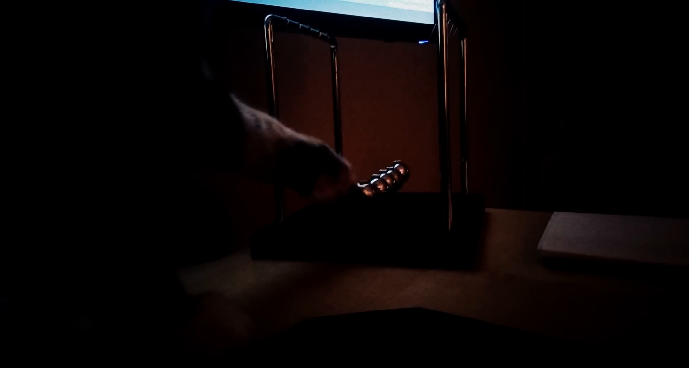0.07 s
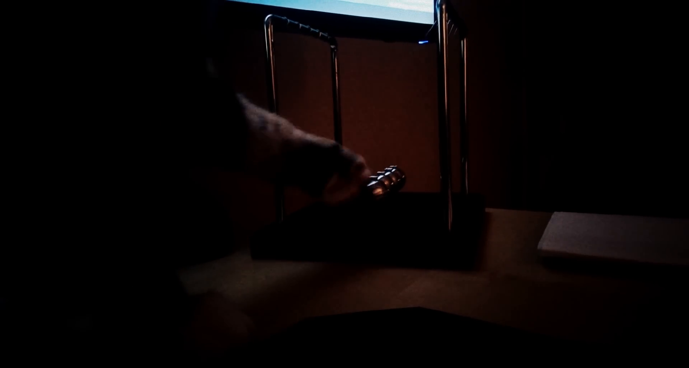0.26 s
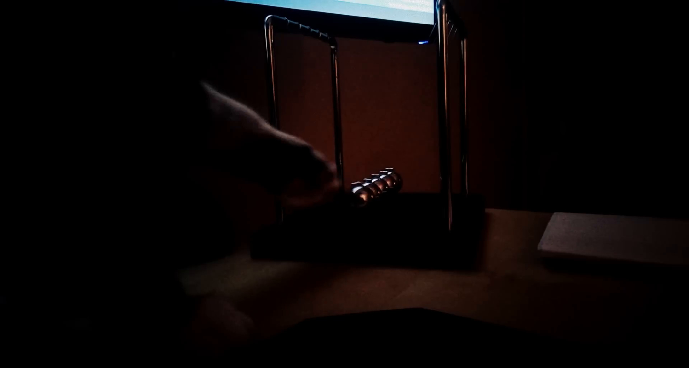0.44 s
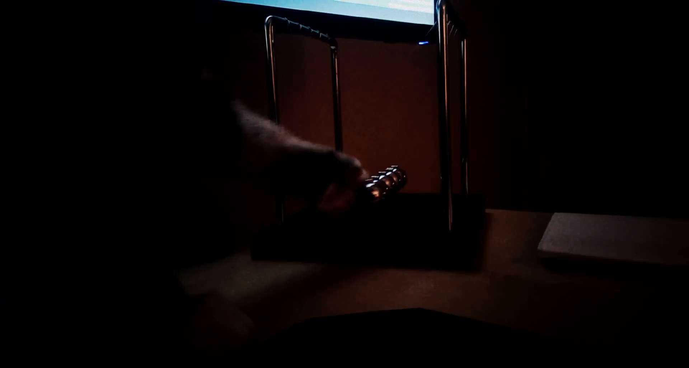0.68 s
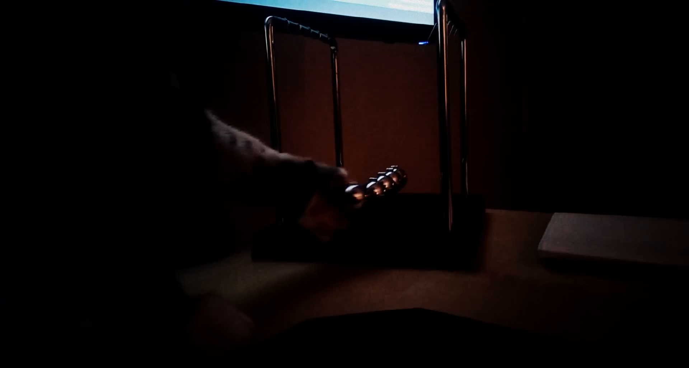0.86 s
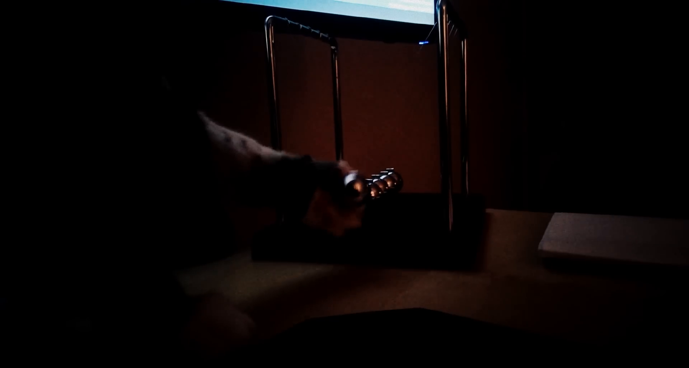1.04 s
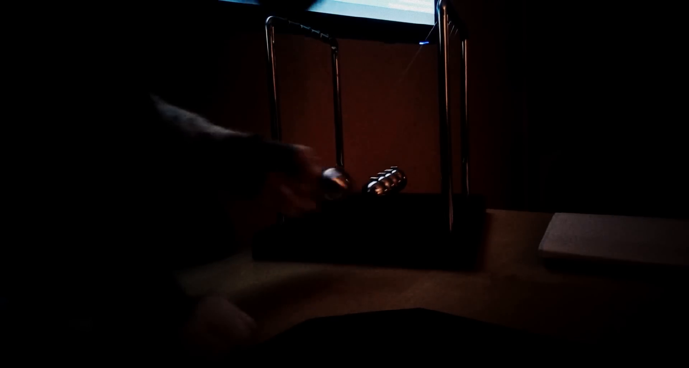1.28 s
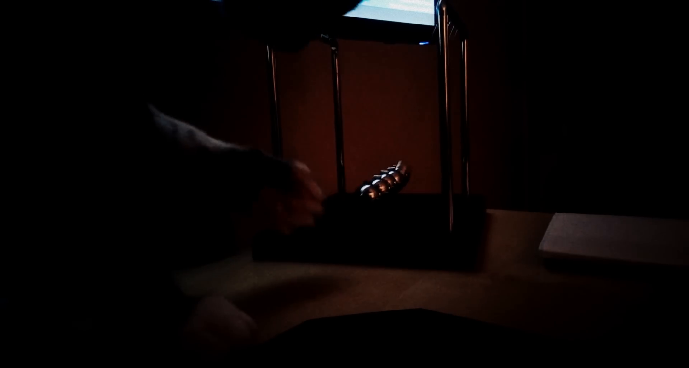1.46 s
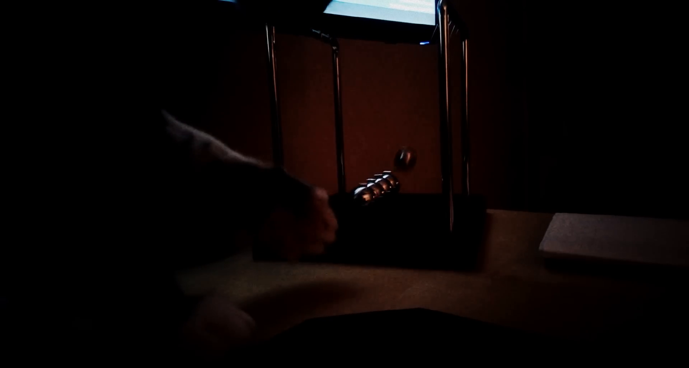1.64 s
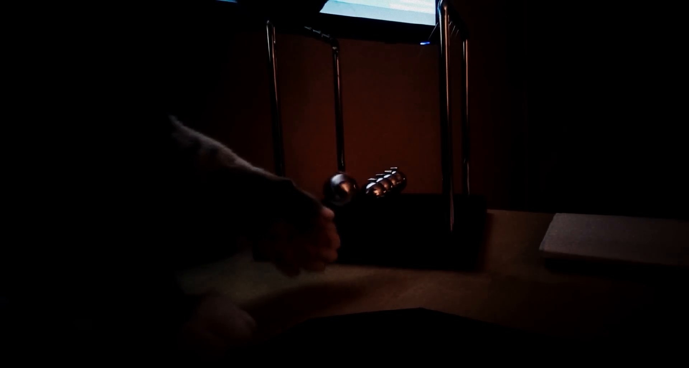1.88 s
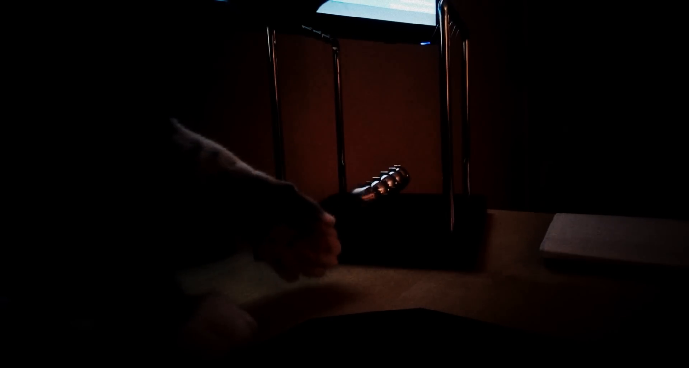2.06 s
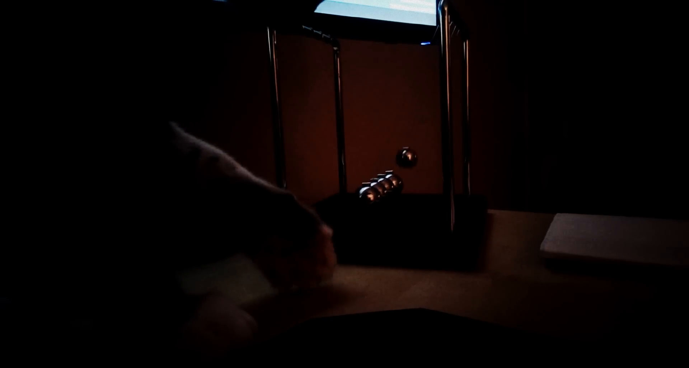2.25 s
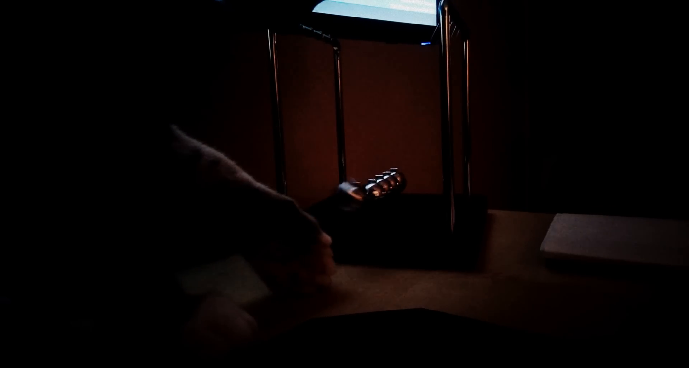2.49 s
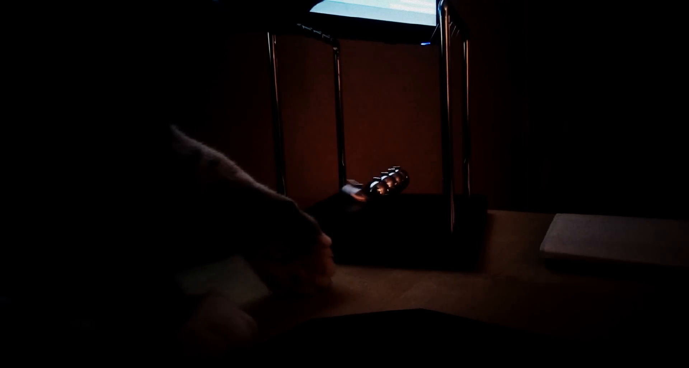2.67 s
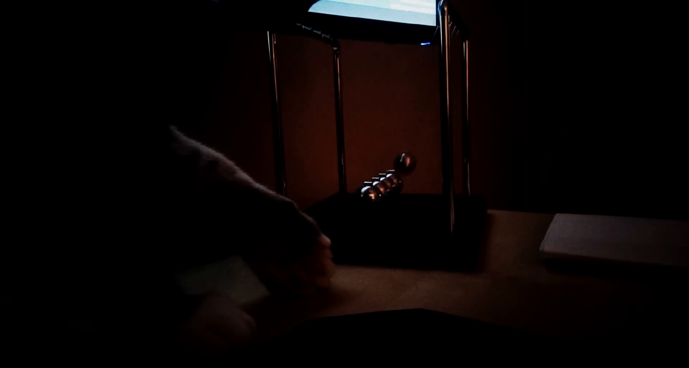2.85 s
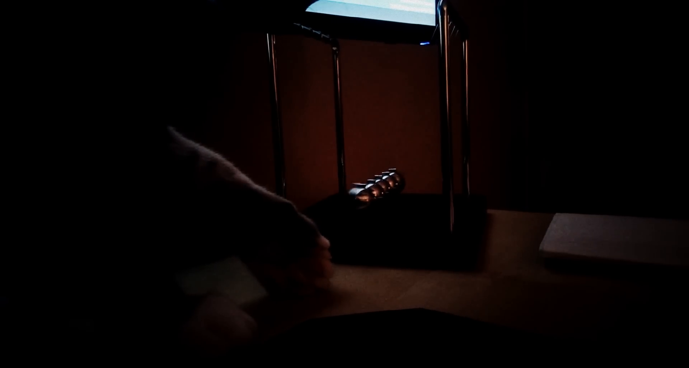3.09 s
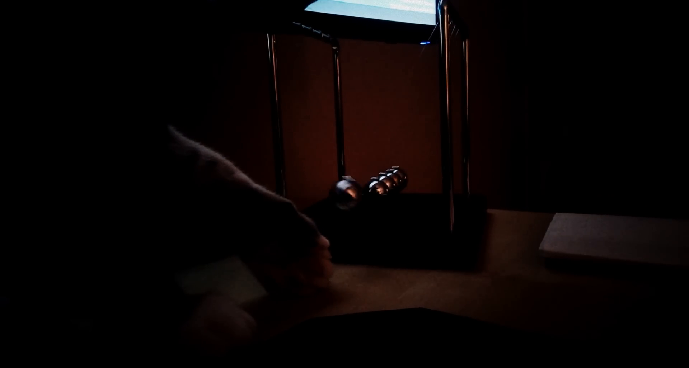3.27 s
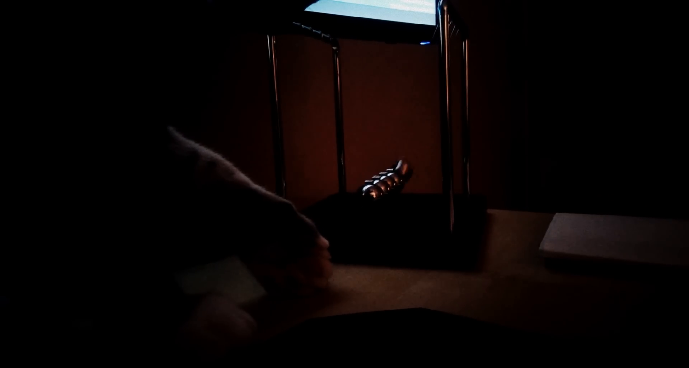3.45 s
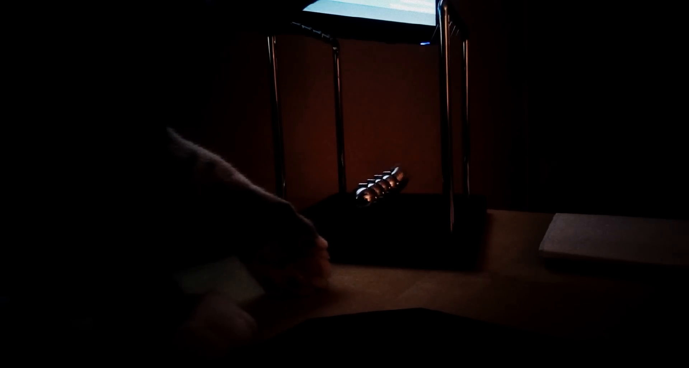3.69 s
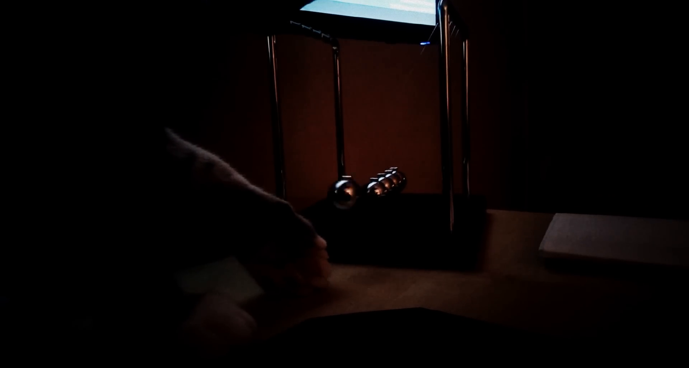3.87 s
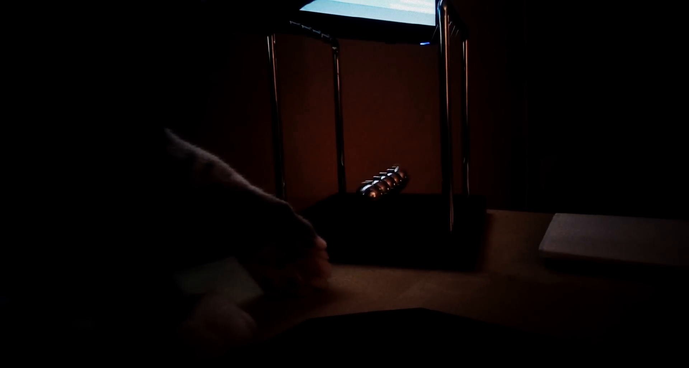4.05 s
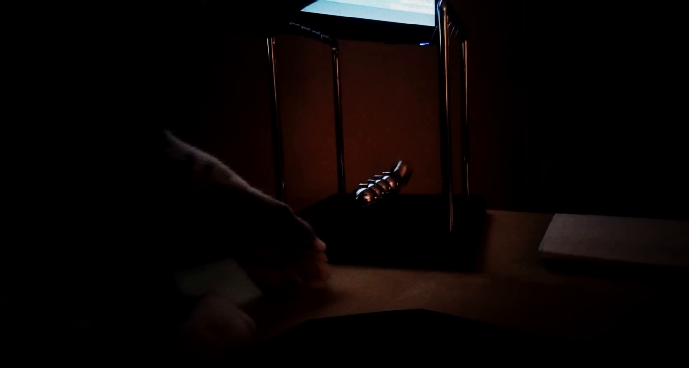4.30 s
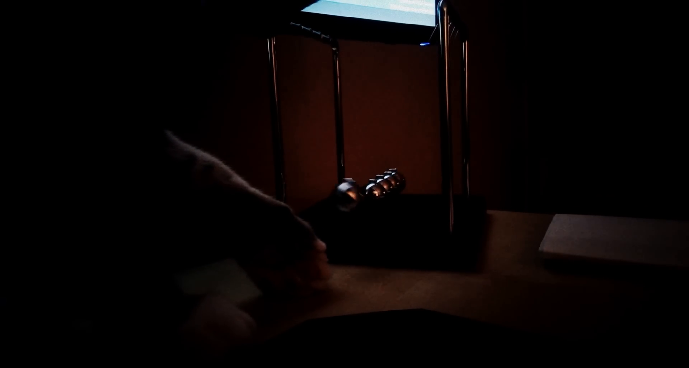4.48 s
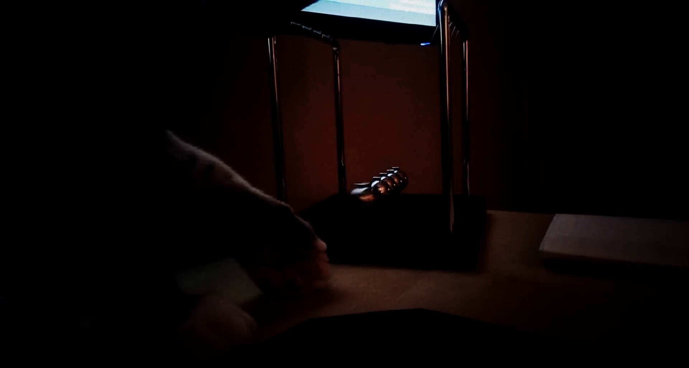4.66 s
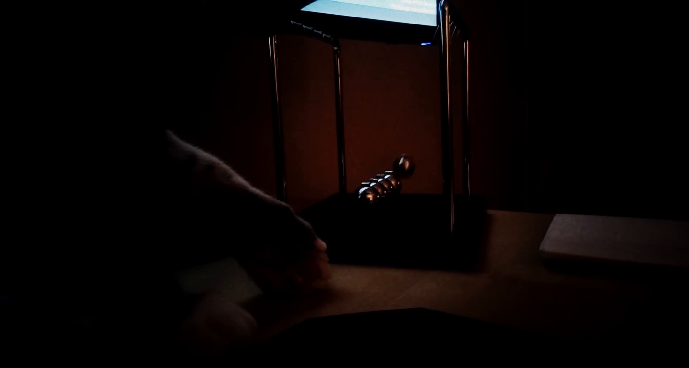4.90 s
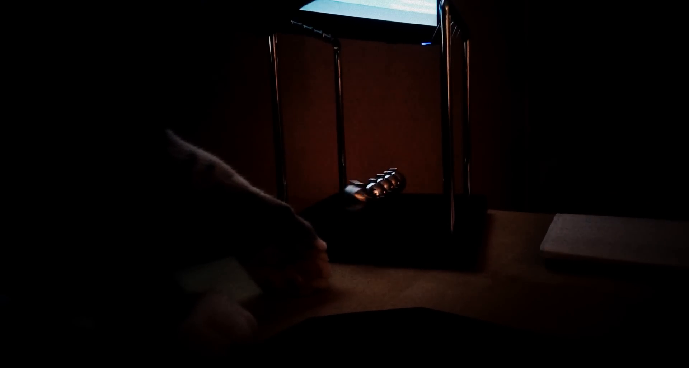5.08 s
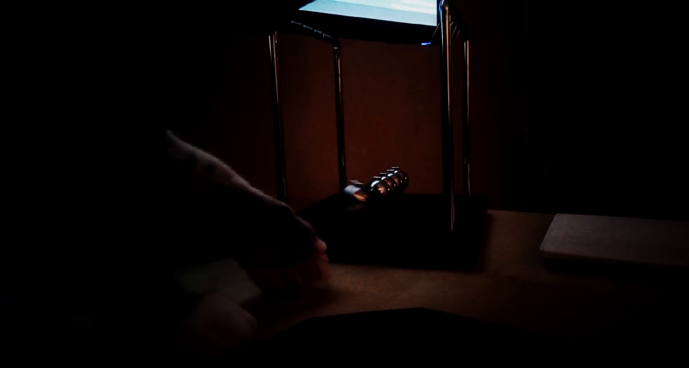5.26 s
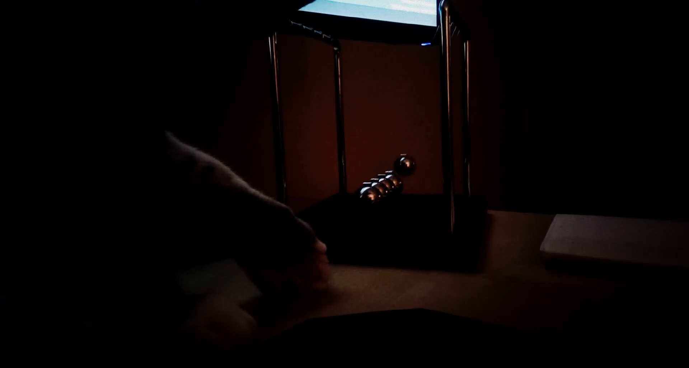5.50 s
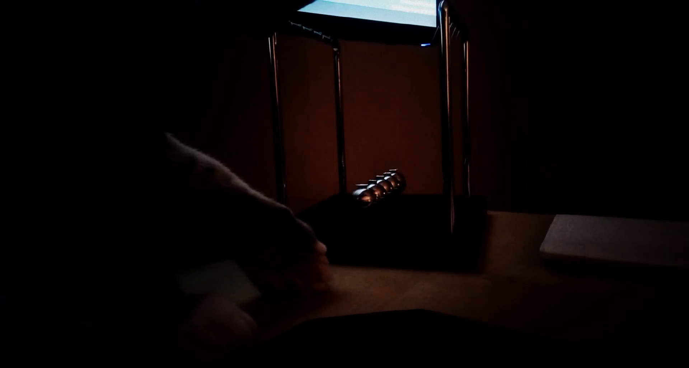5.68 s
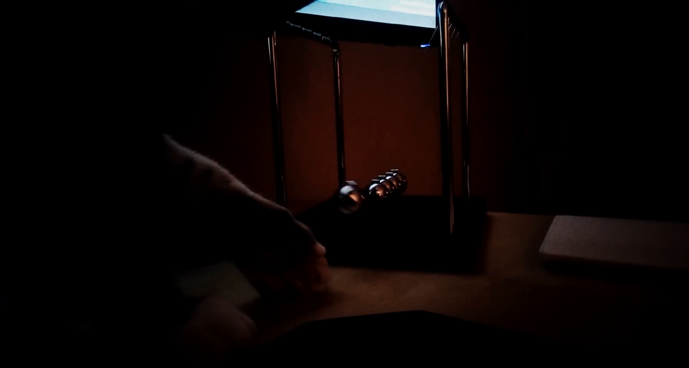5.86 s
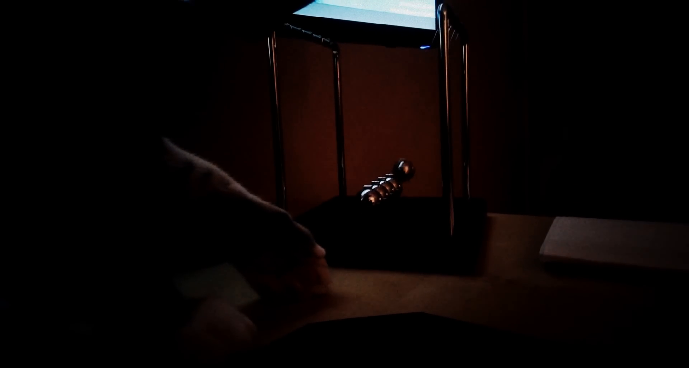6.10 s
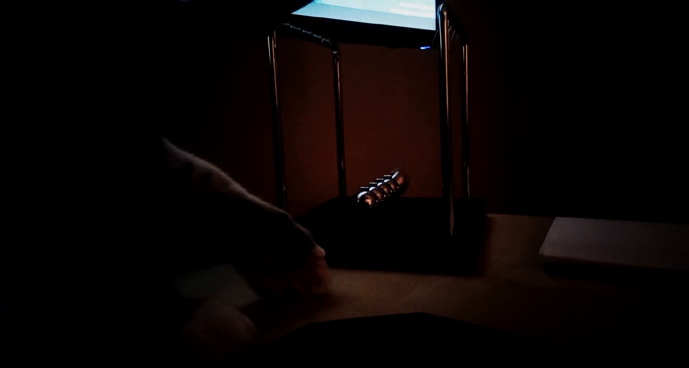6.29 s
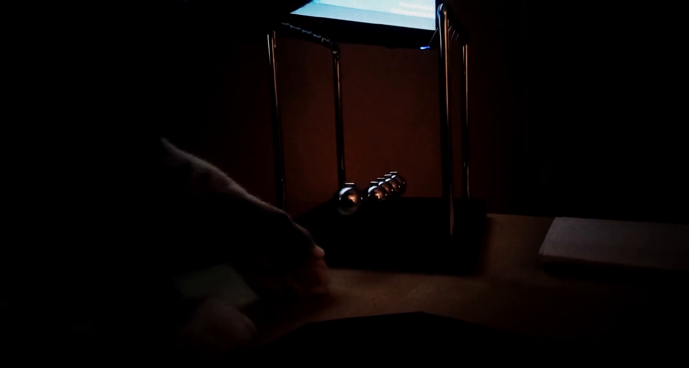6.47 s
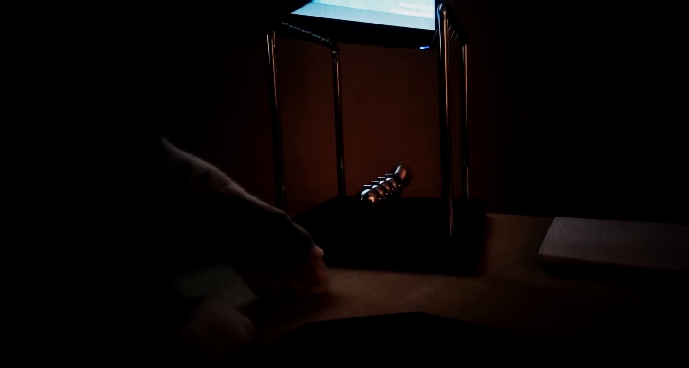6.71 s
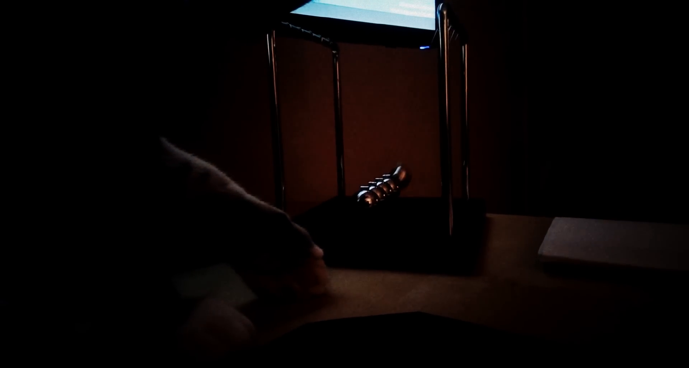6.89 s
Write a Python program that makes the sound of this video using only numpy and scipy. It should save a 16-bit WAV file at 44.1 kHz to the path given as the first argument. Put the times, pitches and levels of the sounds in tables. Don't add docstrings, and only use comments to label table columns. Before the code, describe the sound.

Scattered metallic ticks, then loud bright clacks of swinging steel balls about three times a second, over faint room hum and hiss.

```python
import sys
import numpy as np
from scipy import signal
from scipy.fft import rfft, irfft
from scipy.io import wavfile
from scipy.ndimage import uniform_filter1d, minimum_filter1d

SR = 44100
rng = np.random.default_rng(int(sys.argv[2]) if len(sys.argv) > 2 else 0)


def log_audio(samples):
    frames = np.atleast_2d(samples).T
    limited = np.clip(frames, -1, 1)
    pcm = np.round(limited * 32767).astype(np.int16)
    wavfile.write(sys.argv[1], SR, pcm)


def voltage_ratio(decibels):
    exponent = np.asarray(decibels, float) / 20
    return 10 ** exponent


N = 305613
LEAD = 8820

# delay in seconds, level at far port in dB, at near port in dB,
# centre in Hz, width in Hz.
WALL = (.0268, -33, -23.5, 7504, 7000)


def evened(x):
    return x / np.sqrt(np.mean(x ** 2) + 1e-20)


def read(points, hz, axis=1):
    table = np.transpose(points)
    return np.interp(np.log(hz + 1), np.log(table[0] + 1), table[axis])


def fuzzy(hz, width):
    f = np.fft.rfftfreq(N, 1 / SR)
    band = 1 + (2 * (f - hz) / width) ** 2
    return evened(irfft(rfft(rng.standard_normal(N)) / band, N))


def ring(hz, centre_hz, width):
    return 1j * hz * width / (centre_hz ** 2 - hz ** 2 + 1j * hz * width)


def contacts():
    # start in seconds, peak at near port in dB.
    outer = [(1.56177, -1.7), (1.88848, -1.4), (2.215, -1.2), (2.54153, -1.9), (2.86936, -2.1),
             (3.19595, -2.7), (3.52355, -2.8), (3.85001, -3.7), (4.17799, -4.3), (4.50502, -2.3),
             (4.83235, -4.0), (5.15772, -6.4), (5.484, -3.3), (5.80693, -4.4), (6.13107, -3.6),
             (6.45216, -7.9), (6.7741, -3.9)]
    # start in seconds, peak in dB,
    # then gaps to the next contacts in ms.
    chain = [(1.57243, -3.0, 4.4, 2.44), (1.90056, -2.4, 2.91, 1.09), (2.22955, -2.5, 1.51, .26),
             (2.55616, -3.0, .35, .56), (2.88197, -4.8, .14, 2.39), (3.20699, -2.0, .36, .55),
             (3.53237, -3.6, .45, .34), (3.85668, -4.8, .18, .15), (4.18095, -3.9, .43, .73),
             (4.50468, -7.2, .29), (4.82885, -3.2, .68, .28), (5.15281, -.6, .06),
             (5.47685, -1.5, .13, .08), (5.79958, -4.2, .56, 1.2), (6.12406, -4.1, .7, .17),
             (6.44815, -3.5, .17), (6.77208, -4.1, .77, .64)]
    # start in seconds, then gaps in ms.
    rebounds = [(1.73976, 6.55, 39.43), (2.04633, 17.8, 37.53), (2.36827, 3.46, 32.49),
                (2.68599, 1.27, 23.36), (2.99833, 2.89, 15.73), (3.31017, 4.25, 7.56),
                (3.61065, 2.71, 5.76), (3.91426, 5.62, .6), (4.79466, 4.66, 1.99), (5.08985, 1.43),
                (5.37753, 1.5, .61), (5.66526, 8.78, 5.79), (5.95589, .23, 1.65), (6.23952, .46, 8.38),
                (6.51549, 2.38)]
    # start in seconds, peak in dB, then any gap in ms.
    ticks = [(.1024, -27.5, .19), (.28343, -14, .18), (.3032, -28), (.30406, -15.5), (.32105, -14.6),
             (.39557, -29.7, .68), (.44257, -23.7, .3), (.49524, -29.7), (.50148, -16, .16),
             (.52874, -18.4), (.54182, -21.9), (.68992, -28.8, 3.01), (.73897, -24.6, 2.1),
             (.80669, -17.8, 1.06), (.85124, -22), (1.04802, -26.1, 1.05), (1.11714, -19.2, .77),
             (1.15974, -21.9), (1.35339, -22), (1.42909, -12.2), (1.47029, -22.7), (1.66355, -28.5),
             (2.80902, -39, 11.22), (3.08489, -38.1), (5.70689, -40.6)]
    rebound_db, fade_db_per_s = -18.5, -3
    close_ms, close_db = .22, -1
    far_full_db, far_per_db, far_spread_db = -4.3, 0.06, -0.7

    first_s = rebounds[0][0]
    loose = [(s, rebound_db + fade_db_per_s * (s - first_s), *gaps) for s, *gaps in rebounds]
    rows = []
    for runs, squeezed_db in ((outer + ticks + loose, 0), (chain, close_db)):
        for s, db, *gaps in runs:
            far_db = far_full_db + far_per_db * db + far_spread_db * rng.standard_normal()
            rows.append((s, db, far_db))
            for ms, gap in zip(np.cumsum(gaps), gaps):
                rows.append((s + ms / 1000, db + squeezed_db * (gap < close_ms), far_db))
    return sorted(rows)


def blows(db, late_s, hz):
    # centre in Hz, width in Hz, gain.
    capsule = (14950, 5900, 8)
    contact_s, spread = .000143, .045
    skew, edge_hz = .62, 10100

    s = 2j * np.pi * hz
    q = s * contact_s * (1 + spread * rng.standard_normal(db.shape)) + skew
    force = (1 + np.exp(-q)) / (q ** 2 + np.pi ** 2)
    blur = np.exp(-(hz / (edge_hz * voltage_ratio(.085 * db))) ** 2)
    shape = s ** 2 * force * blur * (1 + capsule[2] * ring(hz, *capsule[:2]))
    shape = shape / (1 + (hz / 16800) ** 40)
    shape = shape / (1 + (950 / (hz + 1)) ** 6)
    trough = -irfft(shape * np.exp(s * .6 / SR)).min(1, keepdims=True) * .87
    return voltage_ratio(db) * shape / trough * np.exp(-s * late_s)


def port(paths, clutter, wall_db, hz, scatter):
    # centre in Hz, width in Hz.
    rings = [(3250, 410), (7380, 130), (1500, 700)]
    out = 0
    for k, (s, plain, *rung) in enumerate(paths):
        late = s * (1 + .012 * scatter[:, [k]])
        size = voltage_ratio(1.5 * min(k, 1) * scatter[:, [k + len(paths)]])
        colour = plain + sum(gain * ring(hz, *body) for gain, body in zip(rung, rings))
        out = out + size * colour * np.exp(-2j * np.pi * hz * late)

    clutter_db, t60_s = clutter
    t = np.arange(2 * len(hz) - 2) / SR
    alike = rng.standard_normal(len(t))
    own = rng.standard_normal((len(scatter), len(t)))
    burst = (alike + 0.53 * own) * voltage_ratio(-60 * t / t60_s) * (t > .0002)
    burst = rfft(burst / np.linalg.norm(burst, axis=1, keepdims=True))
    burst = burst * voltage_ratio(clutter_db) / (1 + (8000 / (hz + 1)) ** 4)

    wall = voltage_ratio(wall_db + 2.5 * scatter[:, [-1]]) * ring(hz, *WALL[3:])
    wall = wall * np.exp(-2j * np.pi * hz * WALL[0])
    return out + burst + wall


def balls():
    # time in seconds, peak in dB, far minus near in dB.
    others = [
        (-.09, 2.5, -4),
        (-.08, -7, -4),
    ]
    # delay in seconds, plain gain, then gain into each body ring.
    far_paths = [
        (.000039, .21, 2.0, -1.19, .5),
        (.00051, .03, 2.05, -.95, 0),
        (.001065, -.14, .16, .13, 0),
        (.001672, -.04, .11, .07, 0),
    ]
    # delay in seconds, plain gain, gain into each body ring.
    near_paths = [
        (0, 1, 0, 0, 0),
        (.000547, .06, 0, 0, 0),
        (.001115, .02, 0, 0, 0),
        (.001416, .07, 0, 0, 0),
    ]
    # level in dB, 60 dB decay in seconds.
    clutter = [
        (-12, 0.0057),
        (-1, 0.00067),
    ]

    s, db, far_db = np.transpose(contacts() + others)[:, :, None]
    size = 2048
    hz = np.fft.rfftfreq(size, 1 / SR)
    place = s * SR + LEAD - 64
    start = np.floor(place).astype(int)
    source = blows(db, (place - start + 62.4) / SR, hz)
    scatter = rng.standard_normal((len(s), 2, 2 * len(far_paths) + 1))
    far = voltage_ratio(.6 * (far_db + 4.8)) * port(far_paths, clutter[0], WALL[1], hz, scatter[:, 0])
    near = port(near_paths, clutter[1], WALL[2], hz, scatter[:, 1])
    pair = np.arange(len(s))[:, None] % 3
    out = np.zeros((5, N + LEAD + size))
    for row, path in zip(out, (far, near, pair == 0, pair == 1, pair == 2)):
        np.add.at(row, start + np.arange(size), irfft(source * path, size))
    return out[:2], out[2:]


def room(pairs):
    # frequency in Hz, 60 dB decay in seconds.
    room_t60 = [(1000, 0.72), (2600, 0.51), (5000, 0.49), (8000, 0.39), (14000, 0.31)]
    # frequency in Hz, left in dB, right in dB.
    room_colour = [(1040, 11, 3.5), (2000, -2.5, 2.5), (3540, 8, -3.5), (4500, 0.5, -5), (5100, 2.5, -3),
                   (6960, -5, -3), (8400, -8, -1), (10130, 2.5, -3), (12500, -9.5, -0.5), (14800, -11, 2)]
    room_db = -14.5

    hz, t, z = signal.stft(rng.standard_normal((3, 2, SR // 2)), SR, nperseg=128)
    colour = np.array([read(room_colour, hz, axis=1), read(room_colour, hz, axis=2)])[:, :, None]
    z = z * voltage_ratio(colour - 60 * t / read(room_t60, hz)[:, None])
    tails = signal.istft(z, SR, nperseg=128)[1] / np.sqrt(SR * .03)
    tails = 0.86 * tails + 0.28 * tails[0]
    rise = np.clip((np.arange(tails.shape[-1]) / SR - .001) / 0.00077, 0, 1)
    wet = signal.oaconvolve(pairs[:, None], tails * rise, axes=2)
    return voltage_ratio(room_db) * wet.sum(0)[:, :pairs.shape[1]]


def air():
    # frequency in Hz, density in dB per Hz.
    air_colour = [(15, -35), (25, -3), (76, -10.5), (238, -3), (368, -8.5), (538, -5), (687, -11.5),
                  (787, -8.5), (1470, -16), (2270, -14.5), (2980, -20), (3510, -21), (8830, -29),
                  (14400, -29.5), (16500, -38.5)]
    # frequency in Hz, likeness of the two ports from -1 to 1.
    likeness = [(60, 0.25), (180, 0.66), (550, 0.78), (1650, -0.5), (4970, 0.18), (15000, -0.067)]
    # frequency in Hz, left minus right in dB.
    left_lean = [(60, 0.5), (180, 2.3), (550, 1.7), (1650, 4.1), (4970, 2.2), (15000, 5.2)]
    air_db = -62

    frames, hz = N // 256 + 5, np.fft.rfftfreq(1024, 1 / SR)
    a, b, c, d = rng.standard_normal((frames, 513, 4)).T
    same = np.clip(read(likeness, hz), -1, 1)[:, None]
    tilt = voltage_ratio(read(left_lean, hz)[:, None] / 2)
    left = a + 1j * b
    right = same * left + np.sqrt(1 - same ** 2) * (c + 1j * d)
    z = np.array([left * tilt, right / tilt])
    z *= voltage_ratio(read(air_colour, hz))[:, None]
    return voltage_ratio(air_db) * evened(signal.istft(z, nperseg=1024, noverlap=768)[1][:, :N])


def hum():
    # frequency in Hz, width in Hz, level in dB.
    lines = [(218.4, 22, -68), (266, 13, -76.5), (315.4, 13.5, -72.5), (412, 39, -80), (496, 20, -78.5),
             (620, 9.4, -87), (732, 13, -81.5), (790, 6, -82), (843, 6.3, -82.5), (1574, 12, -87.5)]
    return sum(voltage_ratio(db) * fuzzy(hz, width) for hz, width, db in lines) * voltage_ratio([[.5], [-.5]])


def desk():
    # frequency in Hz, width in Hz.
    modes = [
        (59, 25.9),
        (132, 28.4),
    ]
    # time in seconds, low mode in dB, high mode in dB.
    thuds = [(.01, -78, -55.5), (.3, -65, -67), (.38, -64, -70), (.52, -64, -69), (.76, -66, -65),
             (1.31, -80, -61), (1.73, -59, -64), (1.91, -66, -68), (1.97, -68, -64), (2.05, -67, -83),
             (2.32, -59, -63), (2.61, -57, -60.5), (2.75, -63, -69), (2.97, -57, -71), (3.22, -60, -59.5),
             (3.63, -66, -72.5), (3.9, -60, -54.5), (4.28, -64.5, -79.5), (4.61, -60, -68),
             (4.87, -65, -70), (5.23, -55, -62.5), (5.55, -64, -75), (5.63, -60, -61.5),
             (5.87, -61.5, -65.5), (6.23, -62, -69), (6.52, -70, -55.5), (6.87, -66, -64.5)]
    # rise in dB per second, fall in dB per second, restless bed in dB.
    shapes = [
        (130, 140, -74),
        (240, 225, -72.5),
    ]

    s, *levels = np.transpose(thuds)
    t, out = np.arange(N) / SR, 0
    coarse = t[::64]
    late = coarse[:, None] - s
    for db, (hz, width), (rise, fall, bed_db) in zip(levels, modes, shapes):
        swell = voltage_ratio(db + np.minimum(rise * late, -fall * late)).sum(1)
        wander = hz + 0.301 * width * fuzzy(0, 16.4)
        out = out + np.interp(t, coarse, swell) * np.sin(2 * np.pi * np.cumsum(wander) / SR)
        out = out + voltage_ratio(bed_db) * fuzzy(hz, 0.92 * width)
    return out


def squeaks():
    # start in seconds, length in seconds, start in Hz, end in Hz, level in dB.
    glides = [
        (.145, .07, 2440, 2390, -73),
        (.152, .047, 2830, 2840, -79),
        (.19, .09, 2410, 2390, -81),
        (.195, .11, 1965, 1910, -76),
        (.85, .08, 1690, 1670, -81),
    ]
    out = np.zeros(N)
    for s, length, start_hz, end_hz, db in glides:
        hz = np.linspace(start_hz, end_hz, int(length * SR))
        at = int(s * SR)
        rough = 2 + uniform_filter1d(rng.standard_normal(len(hz)), 150) * 9
        whistle = np.sin(2 * np.pi * np.cumsum(hz) / SR)
        out[at:at + len(hz)] += voltage_ratio(db) * np.hanning(len(hz)) * rough * whistle
    return out


def scene():
    ports, pairs = balls()
    clacks = (ports + room(pairs))[:, LEAD:LEAD + N]
    return clacks + air() + hum() + desk() + squeaks()


def band_limit(x):
    return signal.sosfilt(signal.butter(12, 17150, fs=SR, output="sos"), x)


def record(dry):
    knee, ceiling = .6, .98
    steady_hz, blow_hz = 15800, 16850
    blow_hold_s, blow_peak = .006, .1

    over = np.maximum(abs(dry) - knee, 0) / (ceiling - knee)
    rounded = dry - np.sign(dry) * (ceiling - knee) * (over - np.tanh(over))

    def limited(size, hz):
        taps = signal.firwin(size, hz, window=("kaiser", 7), fs=SR)
        return signal.oaconvolve(rounded, taps[None], "same")

    low, wide = limited(1023, steady_hz), limited(255, blow_hz)
    hold = int(blow_hold_s * SR)
    held_peak = -minimum_filter1d(-abs(wide).max(0), hold)
    blow = uniform_filter1d(1. * (held_peak > blow_peak), hold // 2)
    return band_limit(low + blow * (wide - low))


dry = scene()
out = record(dry)
log_audio(out)
```